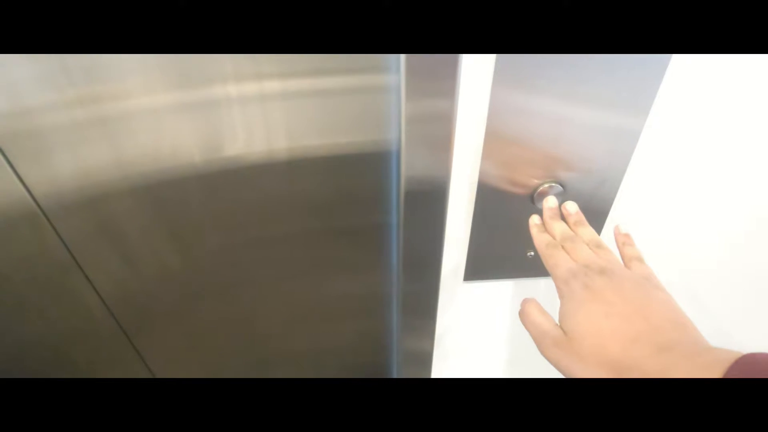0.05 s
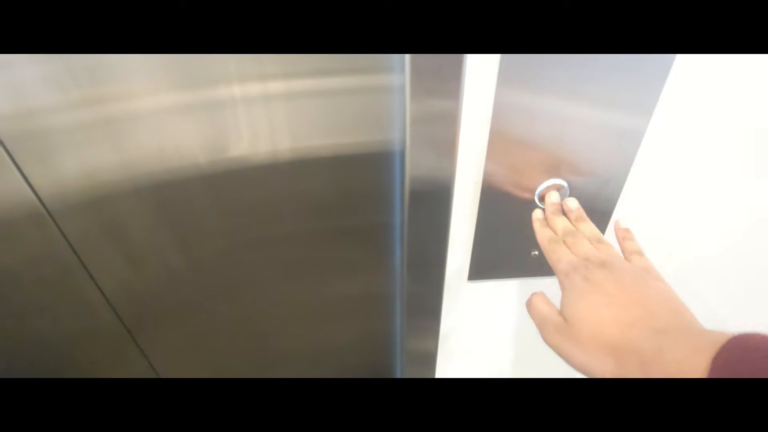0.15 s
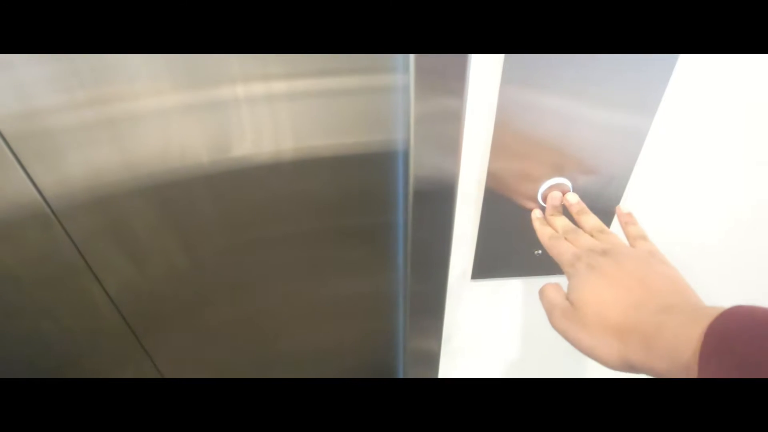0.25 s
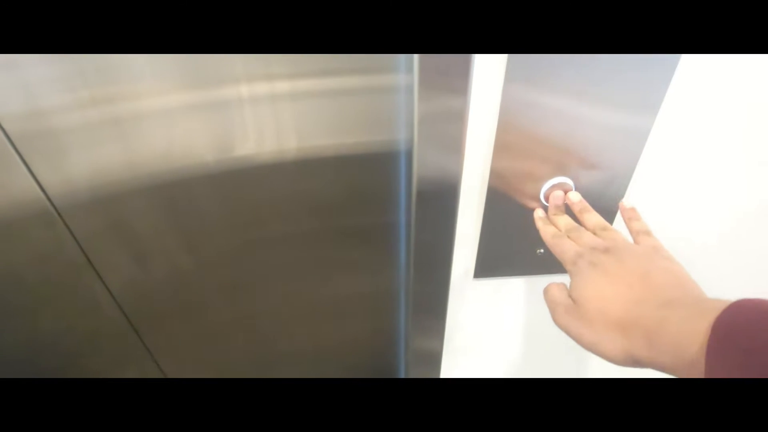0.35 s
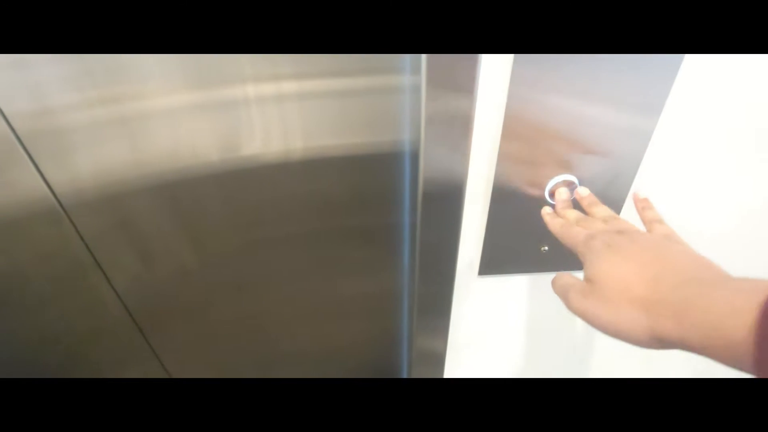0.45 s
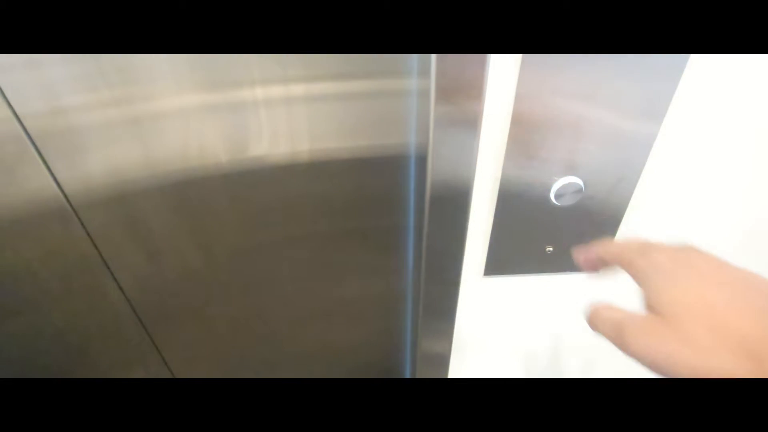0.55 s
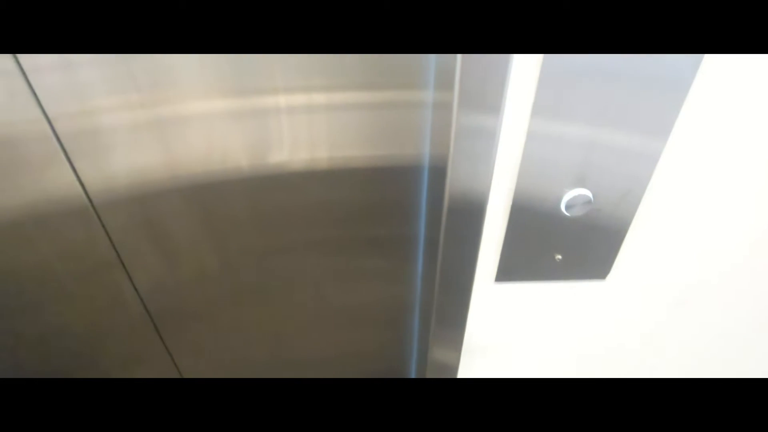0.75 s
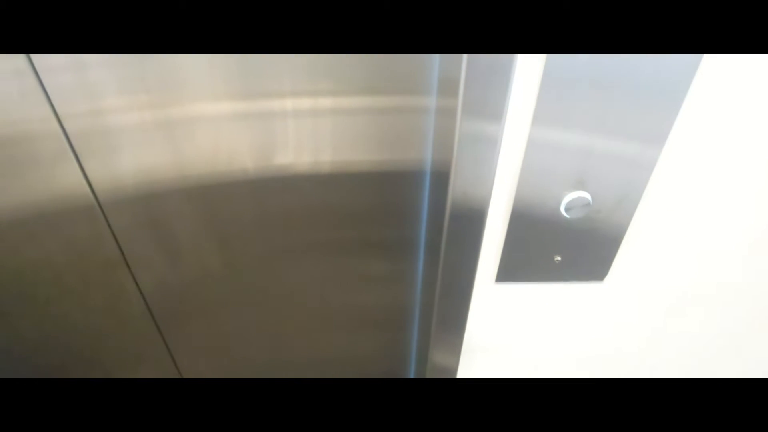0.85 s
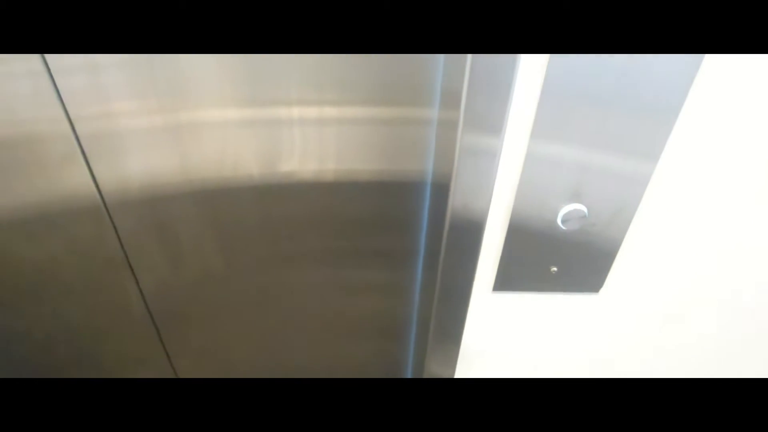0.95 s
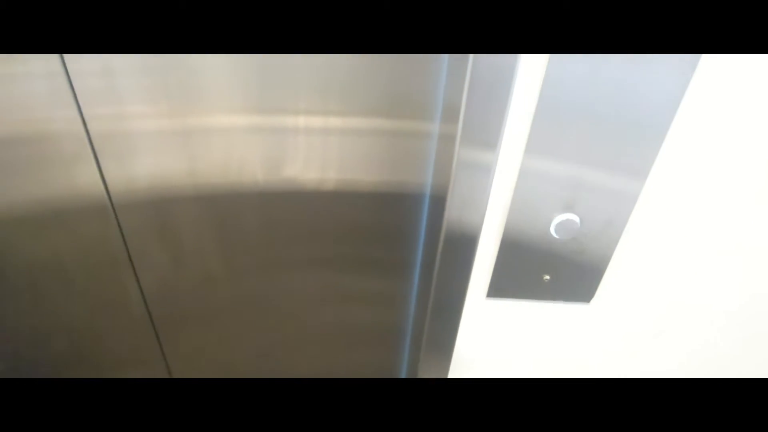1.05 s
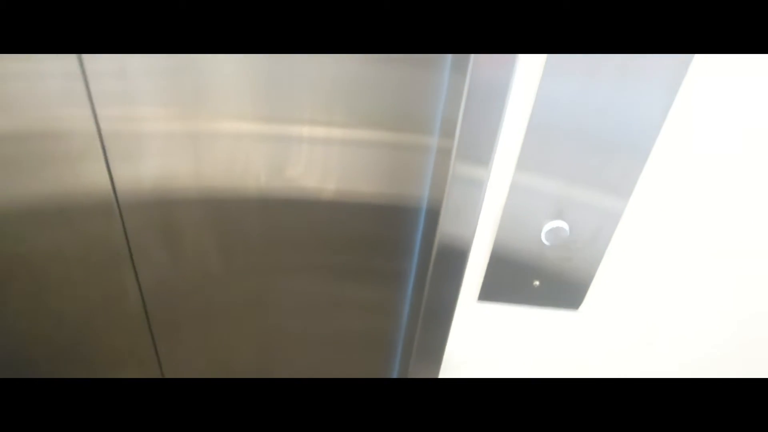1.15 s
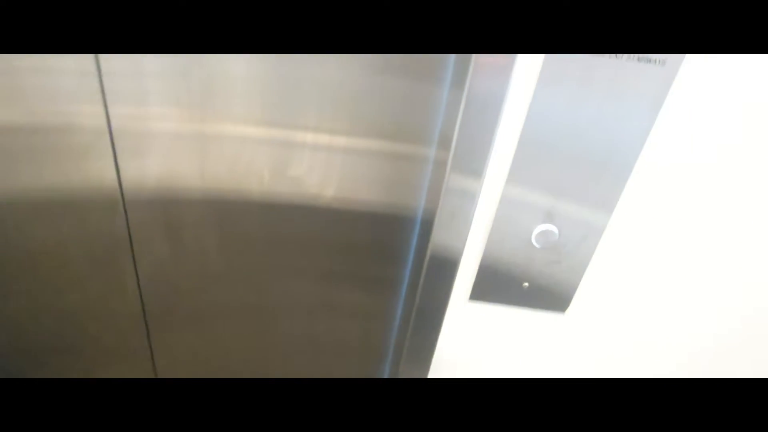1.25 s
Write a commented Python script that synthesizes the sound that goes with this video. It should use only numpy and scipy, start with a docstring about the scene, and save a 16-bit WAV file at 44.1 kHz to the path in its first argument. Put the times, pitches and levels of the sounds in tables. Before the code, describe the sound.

A lift call button clicks in at about 0.25 seconds, a hard clatter ringing its steel panel and echoing in the lobby. At 0.56 it springs back with quick lighter clicks and a thin spring ping. Fingers then rub and knock the handheld camera; its case snaps sharply near 0.96, with small rattles, and more taps follow at 1.07. Low rumble and faint hiss continue throughout.

```python
"""A low rumble and faint hiss fill a hard lobby: shaped noise with slowly changing levels.
A lift's call button clicks in: bursts of noise echo in the lobby, and dying tones ring its steel panel.
Soon it springs back with more clicks, another panel ring and a ping of its spring, made of narrow noise.
Then fingers rub and knock on a handheld camera: noise scuffs, and soft pushes on short hollow tones.
Amid the knocks the case snaps sharply: noise cracks, ringing tones and a brief echo."""
import sys
import numpy as np
from scipy import signal
from scipy.fft import rfft, irfft
from scipy.io import wavfile

SR = 44100
rng = np.random.default_rng(int(sys.argv[2]) if len(sys.argv) > 2 else 0)


def persist_wave(psi):
    """Save psi, clipped to +-1, as 16-bit WAV."""
    counts = np.round(np.clip(psi, -1, 1) * 32767).astype(np.int16)
    wavfile.write(sys.argv[1], SR, np.atleast_2d(counts).T)


N = 57330
HZ = np.fft.rfftfreq(N, 1 / SR)
T = np.arange(N) / SR


def amp(db):
    """Turns decibels into gain."""
    return 10 ** (np.asarray(db) / 20)


def level(curve):
    """Gain over time from a table of seconds and decibels."""
    return amp(np.interp(T, *np.transpose(curve)))


def fade(t60, t=T):
    """Steady dying away: 60 dB quieter after t60 seconds."""
    return np.exp(-np.log(1000) * t / t60)


def read(points, col=1):
    """Reads a table's column at every frequency, on a logarithmic pitch scale."""
    table = np.array(points, float)
    return np.interp(np.log(HZ + 1), np.log(table[:, 0]), table[:, col])


def add(mix, s, sound):
    """Mixes a stereo sound in at time s."""
    at = max(round(s * SR), 0)
    mix[:, at:] += sound[:, :N - at]


def pan(db):
    """Left and right gains; a positive difference is louder on the left."""
    return amp([[db / 2], [-db / 2]])


def noise(colour, same, tilt_db=0):
    """Spectrum of stereo noise with a given colour, left-right likeness and tilt in dB per octave."""
    a, b = rfft(rng.standard_normal((2, N)))
    likeness = np.clip(read(same), -1, 1)
    pair = np.array([a, likeness * a + np.sqrt(1 - likeness * likeness) * b])
    # the tilt turns about 1500 Hz and stays level below 150 Hz
    octaves = np.log2(np.maximum(HZ, 150) / 1500)
    db = np.array([read(colour, col=1), read(colour, col=2)]) + tilt_db * octaves
    low_cut = 1 / np.sqrt(1 + (colour[0][0] / 2 / (HZ + 1)) ** 4)
    return pair * amp(db) * low_cut * np.sqrt(SR / 2)


# left-right likeness of the short noises and rubbing: pitch_hz, likeness (-1 to 1)
CLICK_LIKENESS = [(130, 0.77), (300, 0.89), (600, -0.7), (1300, -0.66), (3000, 0.074), (7000, 0.11)]


def burst(colour, decay, rise, tilt_db=0):
    """Dense ringing that rises quickly and dies at its own speed in each band."""
    z = noise(colour, CLICK_LIKENESS, tilt_db)
    out = np.zeros((2, N))
    for (hz, t60), own in zip(decay, np.eye(len(decay))):
        # each band is full at its own pitch and fades out toward its neighbours
        band = read([(row[0], share) for row, share in zip(decay, own)])
        out += irfft(z * band, N) * fade(t60)
    return out * (1 - np.exp(-T / rise))


def mode(hz, t60, turn=0, lag=0):
    """One dying vibration; turn shifts its cycle, lag delays it in seconds."""
    t = np.maximum(T - lag, 0)
    return np.sin(2 * np.pi * (hz * t + turn)) * fade(t60, t)


# colour of the lobby air before its level curves: pitch_hz, left_db_per_hz, right_db_per_hz
AIR_COLOUR = [(20.3, -80, -65), (45, -58.5, -56.0), (86, -55.5, -55.5), (144.4, -65, -61.5),
              (215, -69, -69.5), (417, -73.5, -68.5), (756, -82, -78), (1450, -86, -89.0), (2660, -97, -99),
              (5730, -99.0, -100.0), (7000, -104.0, -111.0), (8050, -112.0, -123.0),
              (10600, -106.0, -110.0), (12900, -107.0, -102.0), (15500, -108.0, -101.0)]
# likeness of the air at the two microphones: pitch_hz, likeness (-1 to 1)
AIR_LIKENESS = [(60, 0.96), (150, 0.92), (300, 0.48), (700, -0.66), (1400, -0.37), (3000, -0.074),
                (12000, -0.092)]
# level change of the rumble: time_s, level_db
RUMBLE_LEVEL = [(0, -2.5), (.2, 0), (.4, -0.5), (.7, -1), (.82, 2.5), (1.0, 3), (1.09, 1), (1.14, -7),
                (1.3, 0)]
# level change of the hiss: time_s, level_db
HISS_LEVEL = [(0, -3), (.18, -3), (.23, 2.5), (.5, 0), (.72, 1.5), (.9, 0), (1.1, -1.5), (1.3, -4)]
RUMBLE_TOP_HZ = 280


def air():
    """Building rumble that swells slowly, under a faint hiss: one noise split into low and high."""
    z = noise(AIR_COLOUR, AIR_LIKENESS)
    low = 1 / (1 + (HZ / RUMBLE_TOP_HZ) ** 4)
    rumble = irfft(z * low, N) * level(RUMBLE_LEVEL)
    hiss = irfft(z * (1 - low), N) * level(HISS_LEVEL)
    return rumble + hiss


# button clicks, pushed in then springing back:
# start_s, level_db, rise_s, brightness_db_per_octave, lobby_db (added to LOBBY_DB)
CLICKS = [(0.247, -12.5, 0.0002, 3, -12), (.2530, -1.5, 0.00026, 1, -15), (0.2581, 1, 0.0011, 0.7, 0.5),
          (0.279, -18, 0.00036, 5.5, -56), (.5600, -9.5, 0.001, 5.5, -21), (.5640, -14, 0.00092, -6, -11.5),
          (.5700, -5.5, 0.00039, -3.5, -2.5)]
# colour of clicks and lobby before levels and tilt: pitch_hz, left_db_per_hz, right_db_per_hz
CLICK_COLOUR = [(162, -75.5, -80), (270, -56.5, -56.5), (447, -64, -57.5), (630, -62.5, -54.5),
                (910, -49, -48.5), (1410, -52.5, -55), (2330, -54, -56.5), (3670, -67, -61),
                (4440, -82, -62.5), (5900, -70.5, -72), (8500, -83.5, -89.0), (11100, -85.5, -79),
                (15200, -123, -83.5)]
# time for each band of a click to drop 60 dB: pitch_hz, t60_s
CLICK_DECAY = [(250, 0.3), (1000, 0.17), (2500, 0.059), (6000, 0.066), (14000, 0.034)]
# time for each band of the lobby's echo to drop 60 dB: pitch_hz, t60_s
LOBBY_FADE = [(150, 1), (400, 0.7), (1000, 0.58), (2800, 0.25), (7000, 0.47), (14000, 0.36)]
LOBBY_DB, LOBBY_TILT_DB, LOBBY_RISE_S = -10.5, -2.5, 0.0038  # tilt is per octave


def button_clicks():
    """Each click is a short clatter of noise, with a longer, duller echo in the lobby."""
    out = np.zeros((2, N))
    for s, db, rise, bright_db, lobby_db in CLICKS:
        clatter = amp(db) * burst(CLICK_COLOUR, CLICK_DECAY, rise, bright_db)
        lobby = amp(LOBBY_DB + lobby_db) * burst(CLICK_COLOUR, LOBBY_FADE, LOBBY_RISE_S, LOBBY_TILT_DB)
        add(out, s, clatter + lobby)
    return out


# steel panel and wall cavity, before each blow's level: pitch_hz, t60_s, pushed_db, springing_back_db
PANEL_MODES = [(141.6, 1.5, -32.5, -40.5), (225.8, 0.57, -26, -45), (308, 0.59, -33, -35),
               (492, 0.21, -32, -30.5), (680, 0.063, -31, -20.5), (774, 0.3, -31.5, -34),
               (970.6, .2, -25, -42), (982, 0.42, -30, -48), (1229, 0.097, -41, -31.5),
               (1375, 0.11, -53, -26), (1545, 0.15, -41, -49), (1847, 0.26, -31, -43),
               (1980, 0.14, -49, -37), (2216, 0.29, -39, -63), (2330, 0.069, -22.5, -39),
               (2666, 0.063, -26.5, -35.5), (3104, .09, -28, -52), (3620, 0.084, -26, -71),
               (4173, .07, -32.5, -40)]
# blows of the end stops: start_s, level_db, springing_back_share (0 to 1)
PANEL_BLOWS = [(.2560, 0, 0.08), (.5695, 2.5, 0.9)]
PANEL_SWELL_CYCLES = 2.7
PANEL_APART_TURNS = 0.16  # right ahead of left, in cycles; less below 500 Hz


def panel():
    """The end stops set the panel's tones ringing; low ones take longer to build up."""
    out = np.zeros((2, N))
    turn = np.array([[0], [PANEL_APART_TURNS]])
    for s, db, back in PANEL_BLOWS:
        back = np.clip(back, 0, 1)
        ring = np.zeros((2, N))
        for hz, t60, pushed, sprung in PANEL_MODES:
            swell = 1 - np.exp(-T * hz / PANEL_SWELL_CYCLES)
            tone = mode(hz, t60, turn * min(hz / 500, 1))
            ring += amp(pushed + back * (sprung - pushed)) * tone * swell
        add(out, s, amp(db) * ring)
    return out


# ping of the return spring: start_s, pitch_hz, half_width_hz, level_db, t60_s, left_minus_right_db
SPRING_PING = (.5597, 5500, 368, -33.5, 0.1041, -6)


def spring():
    """The return spring pings as it lets go: a narrow band of noise that dies away."""
    out = np.zeros((2, N))
    s, hz, width, db, t60, side_db = SPRING_PING
    narrow = 1 / (1 + ((HZ - hz) / width) ** 2)
    ping = irfft(rfft(rng.standard_normal((2, N))) * narrow, N)
    add(out, s, amp(db) * pan(side_db) * ping / ping.std() * fade(t60))
    return out


# rubbing on the camera: time_s, level_db
RUB_LEVEL = [(0, -41), (.62, 2), (.78, -9), (.86, -1), (.905, 1), (.95, 10.5), (1.0, 4.5), (1.066, 5.5),
             (1.1, -6.5), (1.14, 4.5), (1.19, -9), (1.25, 2.5), (1.3, 2.5)]
# colour of fingers on the camera before levels and tilt: pitch_hz, left_db_per_hz, right_db_per_hz
SKIN_COLOUR = [(201, -85, -77.5), (420, -75, -77.5), (554, -68, -67.5), (790, -82.5, -85.5),
               (1480, -89, -90.5), (2440, -90, -94), (4750, -100, -100), (8600, -112, -122),
               (13700, -106, -100)]


def rubbing():
    """Fingers rub faintly on the camera: soft noise that comes and goes."""
    return irfft(noise(SKIN_COLOUR, CLICK_LIKENESS), N) * level(RUB_LEVEL)


# finger knocks, also used by knocks() below:
# start_s, level_db, contact_s, pitch_factor, left_minus_right_db
KNOCKS = [(.6730, -10, 0.00074, 1, 7.5), (0.9107, 5, 0.00032, 1.015, -0.5), (.9170, -7.5, 0.00087, 0.83, 5),
          (0.9351, -13, 0.00087, 0.616, 8), (1.0703, -14.5, 0.0001, 1.0, 14),
          (1.0723, -3.5, 0.00013, 1.222, -1.5), (1.0753, 2.5, 0.000066, 1.019, 1)]
SCUFF_DB, SCUFF_TILT_DB = 17, -3  # added to each knock's level; per octave
SCUFF_RISE_S, SCUFF_FALL_S = 0.0027, 0.0058


def scuffs():
    """Skin scuffs as the fingertip lands and lifts: noise swells before each knock and fades after."""
    shape = np.zeros(N)
    for s, db, *_ in KNOCKS:
        shape += amp(db) * np.exp(-np.maximum((s - T) / SCUFF_RISE_S, (T - s) / SCUFF_FALL_S))
    return irfft(noise(SKIN_COLOUR, CLICK_LIKENESS, SCUFF_TILT_DB), N) * amp(SCUFF_DB) * shape


# camera body before each knock's level and pitch factor: pitch_hz, t60_s, left_db, right_db
BODY_MODES = [(137, 0.054, -19, -18), (371.5, 0.029, -6.5, -21.5), (514, 0.022, -4.5, -17.5),
              (577, 0.024, -33, -2.5), (776, 0.0078, -12, -3.5), (1028, 0.009, -2.5, -28),
              (1167, 0.012, -7, -23), (1617, .013, -12.5, -24), (2160, 0.0073, -17, -30),
              (2795, 0.0058, -16, -22), (4320, 0.0077, -28, -25)]
PORT_LAG_S = 0.00046  # the right microphone port hears the body later


def knocks():
    """A soft fingertip pushes the camera's heavily damped tones; a longer contact sounds duller."""
    out = np.zeros((2, N))
    for s, db, contact, pitch, side_db in KNOCKS:
        ring = np.zeros((2, N))
        for k, (hz, t60, left_db, right_db) in enumerate(BODY_MODES):
            left = amp(left_db) * mode(hz * pitch, t60)
            right = -amp(right_db) * mode(hz * pitch, t60, lag=PORT_LAG_S)
            ring += (-1) ** k * np.array([left, right])
        push = np.exp(-T[:SR // 100] / contact)
        push /= push.sum()
        add(out, s, amp(db) * pan(side_db) * signal.oaconvolve(ring, push[None], axes=1))
    return out


# the snap and its rattling rebounds:
# start_s, crack_level_db, crack_t60_s, brightness_db_per_octave, case_ring_db
SNAPS = [(0.9573, -2.5, 0.0098, -1, 2), (0.9659, -17.5, 0.016, -2.5, -27), (0.9687, -17.5, 0.019, -8, -38),
         (0.9775, -19, 0.023, -12, -33), (1.0174, -30.5, 0.022, -6.5, -40)]
# colour of the crack before level and tilt: pitch_hz, left_db_per_hz, right_db_per_hz
SNAP_COLOUR = [(510, -81, -76), (1310, -29.5, -56), (2290, -46, -45), (3340, -40.5, -69),
               (5040, -65, -36.5), (6300, -73, -47), (8400, -95, -81), (9950, -47, -59),
               (13700, -67.5, -53)]
# ring of the case before case_ring_db, opposite at the two microphones: pitch_hz, t60_s, left_db, right_db
CASE_MODES = [(255, 0.079, -46, -26.5), (507, 0.043, -6.5, -3.5), (636, 0.047, -16.5, -11),
              (800, 0.034, -15, -20.5), (1030, 0.038, -26, -32.5), (1145, 0.057, -15.5, -36),
              (1258, 0.094, -19, -20.5), (1622, 0.055, -14, -23), (1730, 0.031, -24, -27.5),
              (2976, 0.04, -22, -43), (4550, 0.014, -17.5, -12), (4704, 0.011, -13, -26),
              (5520, 0.049, -27.5, -24)]
# colour of the echo: pitch_hz, left_db_per_hz, right_db_per_hz
ECHO_COLOUR = [(246, -68, -75), (506, -50.5, -49), (900, -54, -59), (1480, -56, -54.5), (2350, -60.5, -71),
               (3250, -62.5, -68), (5270, -89, -64), (8200, -74.5, -104), (10000, -84, -84),
               (14500, -100, -92)]
# time for each band of the echo to drop 60 dB: pitch_hz, t60_s
ECHO_DECAY = [(300, 0.42), (1400, 0.2), (4000, 0.11), (12000, 0.1)]


def snap():
    """A sharp noise crack sets the case ringing and rattling, and echoes briefly."""
    out = np.zeros((2, N))
    ring = np.zeros((2, N))
    for k, (hz, t60, left_db, right_db) in enumerate(CASE_MODES):
        sides = np.array([[amp(left_db)], [-amp(right_db)]])
        ring += (-1) ** k * sides * mode(hz, t60)
    for s, db, t60, bright_db, ring_db in SNAPS:
        crack = irfft(noise(SNAP_COLOUR, CLICK_LIKENESS, bright_db), N) * fade(t60)
        add(out, s, amp(db) * crack + amp(ring_db) * ring)
    add(out, SNAPS[0][0], burst(ECHO_COLOUR, ECHO_DECAY, rise=0.004))
    return out


def scene():
    """All sources together at the two microphones."""
    return air() + button_clicks() + panel() + spring() + rubbing() + scuffs() + knocks() + snap()


NOTCH_HZ, NOTCH_WIDTH_HZ, NOTCH_DB = 7980, 620, -5.5
EDGE_HZ = 16100


def record(dry):
    """The microphone ports weaken a narrow treble band, peaks clip at full scale, and the top is cut off."""
    ports = amp(NOTCH_DB * np.exp(-((HZ - NOTCH_HZ) / NOTCH_WIDTH_HZ) ** 2))
    clipped = np.clip(irfft(rfft(dry) * ports, N), -1, 1)
    low_pass = signal.firwin(255, EDGE_HZ, window=("kaiser", 8), fs=SR)
    return signal.oaconvolve(clipped, low_pass[None], "same")


dry = scene()
out = record(dry)
persist_wave(out)
```